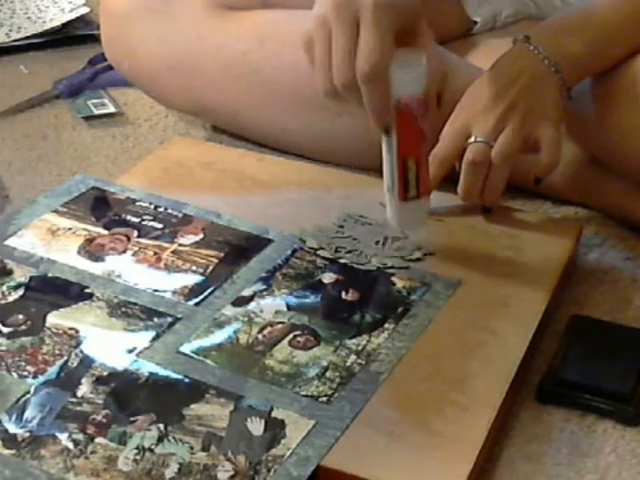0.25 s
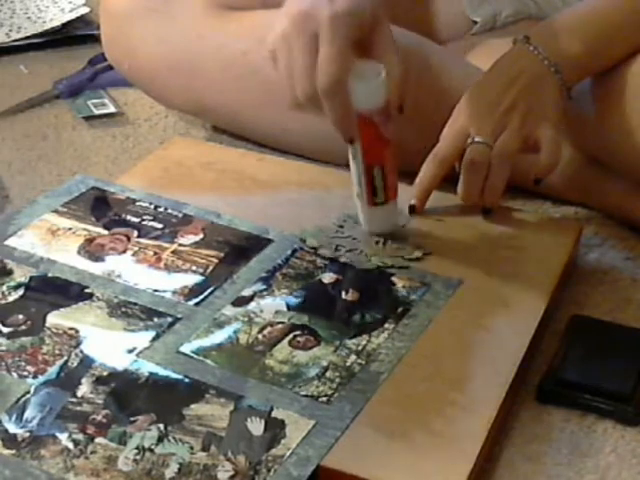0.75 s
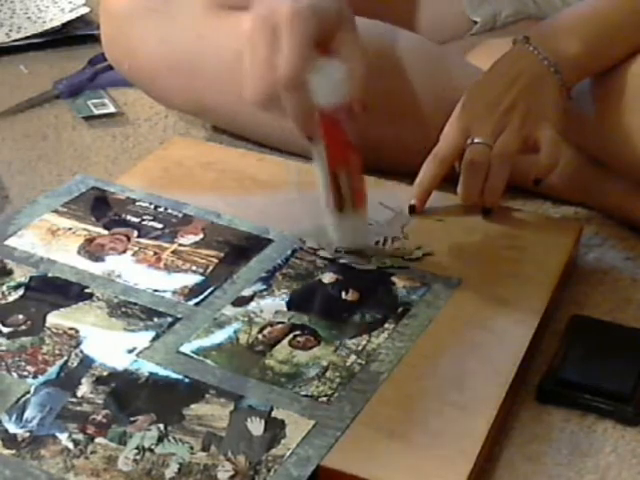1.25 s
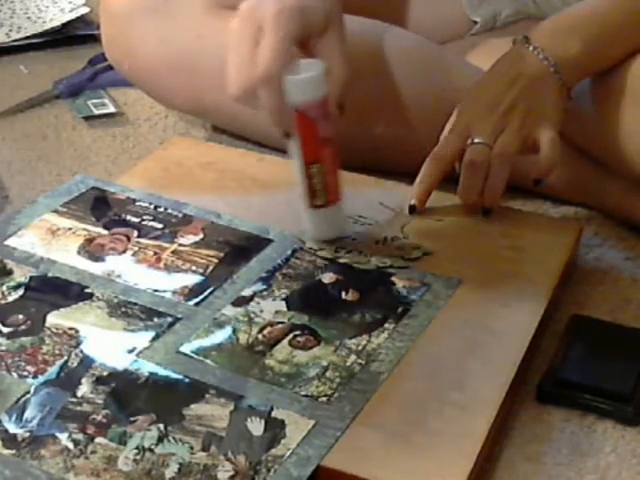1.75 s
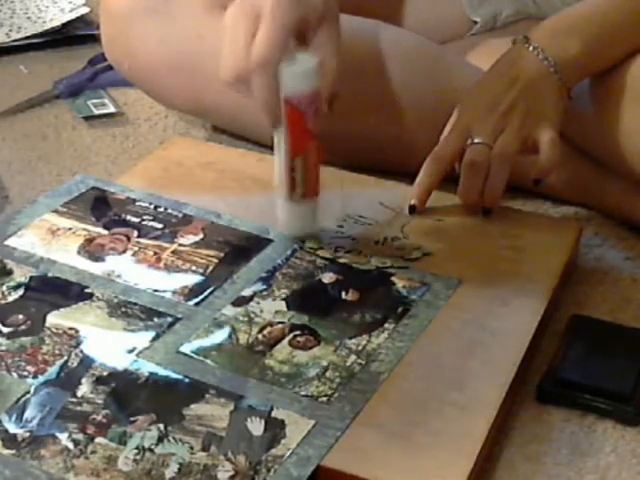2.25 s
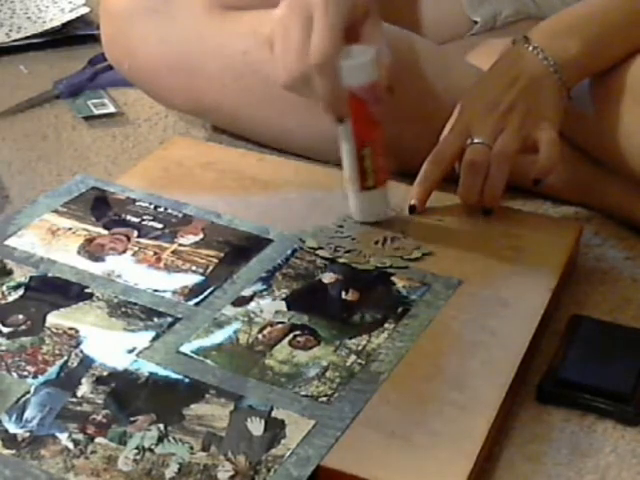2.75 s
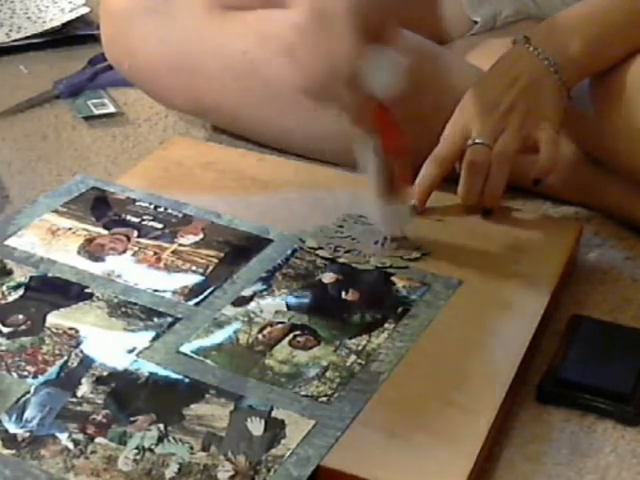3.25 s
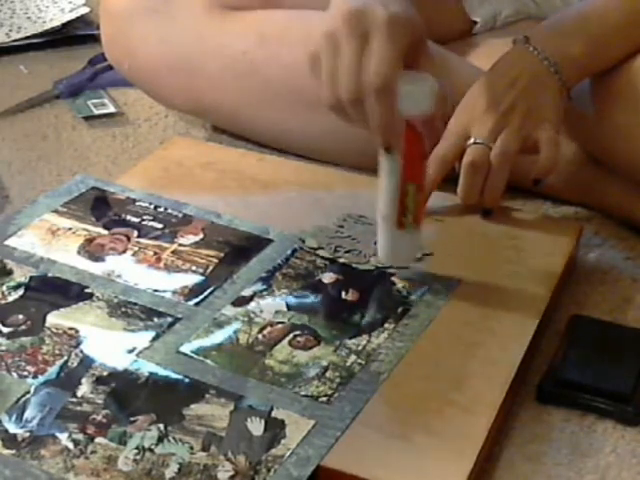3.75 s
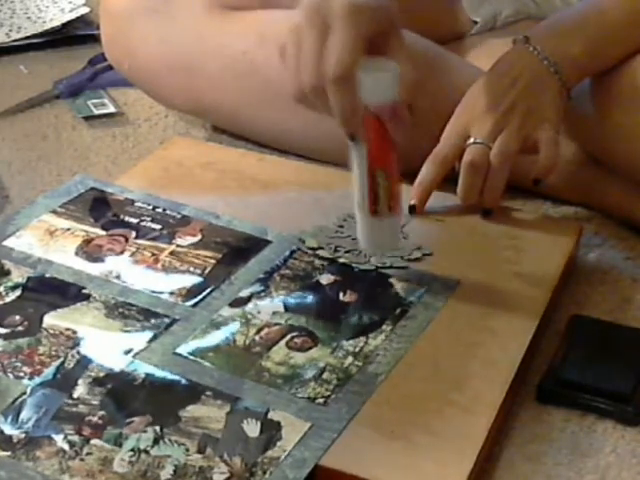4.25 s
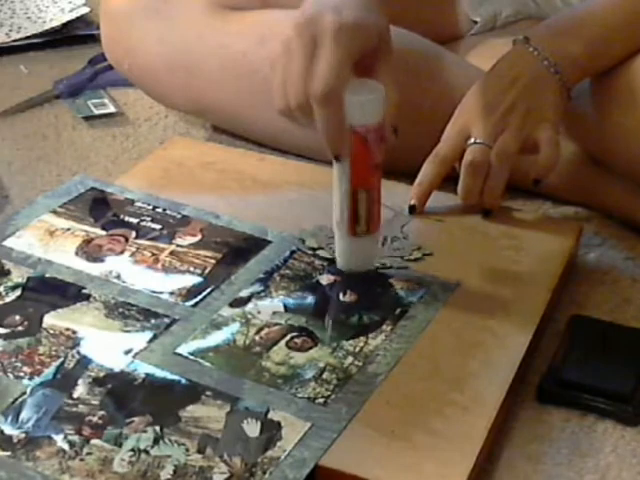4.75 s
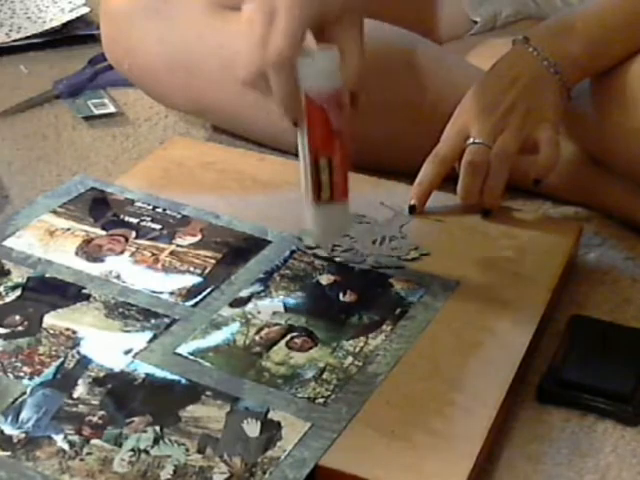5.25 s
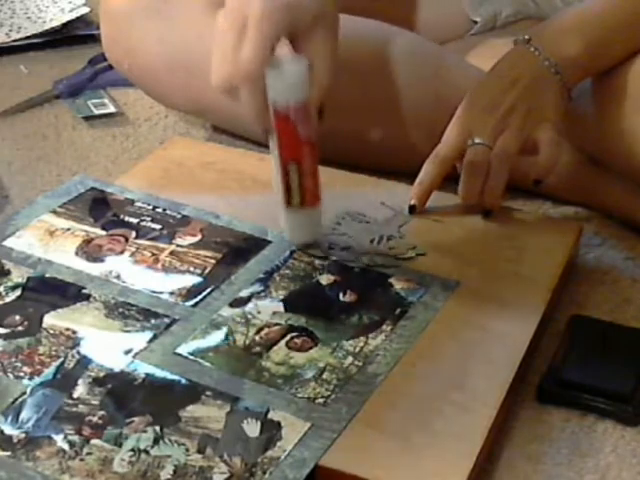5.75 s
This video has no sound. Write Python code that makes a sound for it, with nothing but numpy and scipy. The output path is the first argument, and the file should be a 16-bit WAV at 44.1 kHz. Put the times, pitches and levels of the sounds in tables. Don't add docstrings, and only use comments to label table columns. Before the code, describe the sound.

Close, dry indoor sound from a small camera microphone: steady low hum and hiss, with muffled low knocks of a glue stick on a board. Regular dabs come around two to three seconds, then lighter rubbing with papery rustles and stick-slip flutters, a bright snap, and three heavier thumps before six seconds.

```python
import sys
import numpy as np
from scipy import signal
from scipy.fft import rfft, irfft, next_fast_len
from scipy.io import wavfile
from scipy.ndimage import uniform_filter1d, map_coordinates

SR = 44100
rng = np.random.default_rng(int(sys.argv[2]) if len(sys.argv) > 2 else 0)


def materialize(psi):
    bounded = np.clip(np.atleast_2d(psi).T, -1, 1)
    quanta = np.round(bounded * 32767).astype(np.int16)
    wavfile.write(sys.argv[1], SR, quanta)


def gain_from_db(level_db):
    decades = np.asarray(level_db, float) / 20
    return 10 ** decades


N = 264582


def unit(x):
    return x / np.sqrt(np.mean(x ** 2) + 1e-20)


def along(points, hz):
    f, v = np.transpose(points)
    return np.interp(np.log(hz + 1), np.log(f + 1), v)


def wobble(rate):
    values = rng.standard_normal(int(N * rate / SR) + 4)
    return map_coordinates(values, [np.arange(N) * rate / SR])


def filtered(x, response):
    m = next_fast_len(len(x) + 8192)
    spectrum = rfft(x, m) * response(np.fft.rfftfreq(m, 1 / SR))
    return irfft(spectrum, m)[:len(x)]


def resonances(modes):
    def response(f):
        total = 0
        for k, (centre, width, db) in enumerate(modes):
            ringing = 1j * f * width / (centre * centre - f * f + 1j * f * width)
            total = total + (-1) ** k * gain_from_db(db) * ringing
        return total
    return response


def add(track, s, sound):
    part = track[max(round(s * SR), 0):][:len(sound)]
    part += sound[:len(part)]


def burst(t, rise, hold, t60):
    rise = max(rise, 1 / SR)
    onset = np.sin(np.pi / 2 * np.clip(t / rise, 0, 1)) ** 2
    fade = gain_from_db(-60 * np.clip(t - rise - hold, 0, None) / max(t60, .003))
    return onset * fade


def even(x):
    return unit(x / np.abs(signal.hilbert(x)) ** .5)


def hiss():
    # frequency in Hz, level in dB per Hz.
    hiss_colour = [(30, -33), (55, 4.5), (80, -2), (200, -1), (450, -5.5), (1100, -11), (1700, -15),
                   (2600, -17.5), (3400, -20.5), (5000, -22), (6500, -19), (7800, -30), (10000, -32),
                   (15700, -34.5)]
    z = signal.stft(rng.standard_normal(N), nperseg=512)[2]
    across_pitch = uniform_filter1d(rng.standard_normal(z.shape), size=6, axis=0)
    patches = uniform_filter1d(across_pitch, size=14, axis=1)
    patchy = signal.istft(z * gain_from_db(0.66 * unit(patches)), nperseg=512)[1][:N]
    return gain_from_db(-72.5 + 3.5) * unit(filtered(patchy, lambda f: gain_from_db(along(hiss_colour, f))))


def hum():
    # frequency in Hz, rms level in dB, speed of the wavering in Hz.
    hum_lines = [(92.5, -69.5, 4.5), (118, -79.5, 6.4), (166.6, -80, 6.2), (362.7, -76.5, 7.5),
                 (383.4, -65.5, 2), (855, -95, 11), (2630, -92.5, 12)]
    out, t = np.zeros(N), np.arange(N) / SR
    for hz, db, unsteady in hum_lines:
        drift = 0.14 * wobble(unsteady)
        out += gain_from_db(db + 2 + 1.7 * wobble(unsteady)) * np.sin(2 * np.pi * hz * t + drift)
    return out


def murmur():
    # time in seconds, level in dB.
    stir = [(0.0, -62), (0.13, -84), (0.72, -67), (0.92, -62), (1.19, -71.5), (1.47, -67.5), (2.09, -78),
            (2.55, -67), (3.93, -71), (4.4, -68), (4.66, -61), (5.08, -67.5), (5.41, -62.5), (5.78, -61.5),
            (6.0, -72)]
    pushes = rng.standard_normal(N) * gain_from_db(3.7 * wobble(25))
    board = resonances([(116, 69, 0.5), (156, 33, 0.95), (232, 41, -2.7)])
    s, stir_db = np.transpose(stir)
    level = np.interp(np.arange(N) / SR, s, stir_db)
    return gain_from_db(level - 8.0) * unit(filtered(pushes, board))


def scuffs():
    # start in seconds, peak in dB, upper tone in dB
    # against the peak, upper tone in Hz, length in seconds.
    stick_scuffs = [(0.752, -53, -9, 860, 0.01), (0.811, -58, -15, 850, 0.018),
                    (1.219, -68, 4.5, 840, 0.017), (2.1, -58.5, -20, 800, 0.014),
                    (2.37, -60, -19, 869, 0.021), (2.469, -41, -28, 850, 0.011),
                    (2.484, -44, -28, 840, 0.012), (2.821, -50.5, -15, 1077, 0.023),
                    (2.98, -51, -9.5, 814, 0.034), (3.396, -51.5, -11.5, 766, 0.013),
                    (3.598, -54.5, 0, 804, 0.017), (3.605, -43.5, -12.5, 786, 0.016),
                    (3.759, -54.5, -25, 991, 0.013), (3.951, -55.5, -17, 993, 0.013),
                    (4.135, -56.5, -7, 847, 0.026), (4.177, -53, -20, 824, 0.02),
                    (4.63, -50, -11, 900, 0.051), (4.643, -44.5, -8, 828, 0.028),
                    (5.214, -52, -30, 880, 0.009), (5.367, -51.5, -23, 825, 0.02),
                    (5.617, -49, -19, 880, 0.014), (5.8, -50, -24, 840, 0.029),
                    (0.208, -65, 2, 600, 0.013), (0.368, -57.5, -1.5, 700, 0.025),
                 (0.368, -61.5, 5, 1266, 0.014), (0.369, -60.5, 4.5, 1004, 0.014),
                 (0.385, -52.5, -7, 1030, 0.016), (3.012, -63.5, 2, 880, 0.013),
                 (4.656, -45, -7.5, 830, 0.017), (5.879, -51.5, -13, 1240, 0.017),
                 (5.941, -41.5, -15, 1315, 0.012), (5.935, -54, -5, 910, 0.019),
                 (5.94, -64, -4.5, 1676, 0.019)]
    # frequency in Hz, width in Hz, level in dB.
    board_tones = [(857, 14.6, -1.5), (1310, 57, -14.5), (2350, 190, -10)]
    out, t = np.zeros(N), np.arange(SR // 4) / SR
    lower = resonances([(489, 170, 0)])
    for s, db, upper_db, upper_hz, length in stick_scuffs:
        rub = rng.standard_normal((2, len(t)))
        upper = resonances([(upper_hz, 160, 0)] + board_tones)
        wood = even(filtered(rub[0], lambda f: lower(f) ** 2))
        wood = wood + gain_from_db(upper_db + 4.0) * even(filtered(rub[1], lambda f: upper(f) ** 2))
        shape = burst(t, 0.18 * length, 0.5 * length, 5 * length)
        add(out, s - .004, shape * gain_from_db(db - 9.5) * wood)
    return out


def nudges():
    # start in seconds, peak in dB, middle mode and low mode in dB against the peak.
    light_nudges = [(0.357, -60, -4, 14), (0.385, -59, -6, 0), (0.454, -60, -4, -5), (0.75, -59.5, 0, 10.5),
                    (0.772, -59, 4, 5), (0.788, -63, 5, 2), (0.906, -62, -8, -7), (1.478, -67, -10, 5),
                    (1.747, -50, -15, -10), (2.357, -66, 9, -15), (2.416, -65, -9, 10),
                    (2.507, -60, -13, 9), (2.581, -58, -2, -6), (2.607, -60, -5, -2),
                    (2.973, -52.5, -11, -1), (2.987, -52.5, -2, -1.5), (3.396, -58, -2, -20),
                    (3.529, -61, 1.5, -1), (3.672, -58, -10, -3), (3.963, -60.5, 3, 6), (2.883, -58, 3, -6),
                    (5.013, -52.5, 3.5, 1), (5.407, -52.5, -7, 1), (5.847, -55, -9, 8)]
    return [row + (264, 0.0096) for row in light_nudges]


def presses():
    # start in seconds, peak in dB, middle mode in dB against the peak,
    # upper mode in Hz, loss to the first rebound in dB.
    firm_dabs = [(0.362, -44, -19, 320, 9), (0.747, -42.5, -5.5, 268, 12), (1.733, -30, -10, 266, 23),
                 (2.13, -31.5, -9, 265, 20), (2.46, -29, -10, 263, 13.5), (2.811, -30.5, -5, 261.6, 15),
                 (3.383, -43.5, -20, 296, 20), (3.946, -41, -18, 294, 15), (5.023, -47.5, 1, 255, 25),
                 (5.361, -21, -15, 269.4, 15.5), (5.607, -22.5, -18, 275.3, 27.5),
                 (5.792, -15.5, -14, 270.7, 24.5)]
    contact_s, flight_s = 0.011, 0.023
    touches = []
    for s, db, middle_db, hz, loss_db in firm_dabs:
        low_db = -71 + 0.2 * (db + 30) - db
        press_s = contact_s + 0.00006 * (db + 32.5)
        touches.append((s, db, middle_db, low_db, hz, press_s))
        for k in range(3):
            rebound_db = db - loss_db - 12 * k
            touches.append((s + flight_s * (k + 1), rebound_db, middle_db + 3.5, -9, hz, contact_s))
    return touches


def drags():
    # start in seconds, peak in dB, time between slips in seconds, fade per slip in dB,
    # upper mode in Hz.
    sticky_drags = [(3.597, -45.5, 0.027, 0.5, 258), (4.113, -43.5, 0.027, 3, 261),
                    (4.514, -54.5, 0.035, 2.5, 258), (4.632, -44.5, 0.032, 5, 268),
                    (4.712, -50, 0.016, 3, 259), (5.822, -39, 0.022, 4, 256), (5.883, -44, 0.022, 10, 283)]
    return [(s + gap * k, db - fade_db * k, -23.5, -21, hz, 0.014)
            for s, db, gap, fade_db, hz in sticky_drags for k in range(3)]


def thumps():
    # frequency in Hz, level in dB, stretch of the contact time.
    low_modes = [
        (155.7, 6, 0.9),
        (90.2, 4.5, 1.5),
    ]
    out, t = np.zeros(N), np.arange(SR // 8) / SR

    def swell(life):
        choked = np.exp(-(t / life) ** 3.23)
        return np.tanh(t / 0.0028) ** 2 * (choked + 0.046 * np.exp(-t / 0.055))

    for s, db, middle_db, low_db, hz, contact in nudges() + presses() + drags():
        upper = np.sin(2 * np.pi * hz * t * (0.984 + 1.8 * t))
        thump = -gain_from_db(db - 4.5) * swell(1.38 * contact) * upper
        for rel_db, (mode_hz, mode_db, stretch) in zip((middle_db, low_db), low_modes):
            tone = np.sin(2 * np.pi * mode_hz * (t - .0038))
            thump -= gain_from_db(db + rel_db + mode_db) * swell(stretch * contact) * tone
        add(out, s + 0.00573, thump)
    return out


def rustles():
    # start in seconds, peak in dB, hold in seconds, boost at the centre in dB, centre in Hz.
    paper_ticks = [(0.363, -51, 0.014, 1, 5790), (0.368, -42, 0.0036, 15, 4000),
                   (0.75, -55.5, 0.007, 1, 2630), (0.89, -55, 0.01, -2, 6430),
                   (1.344, -60.5, 0.012, 9, 2650), (2.1241, -60, 0.011, 4, 2670),
                   (2.464, -52.5, 0.0059, 6, 3800), (2.813, -54.5, 0.012, 20, 2270),
                   (3.946, -58, 0.012, 5, 3690), (4.129, -46, 0.022, 15, 2450),
                   (4.121, -39, 0.02, -16, 6250), (4.626, -54, 0.0065, 12, 3700),
                   (4.634, -54.5, 0.014, 20, 2300), (5.006, -53, 0.02, -1, 5360),
                   (5.019, -37.5, 0.0052, 1, 5050), (5.069, -50.5, 0.015, 5, 6200),
                   (5.362, -41, 0.0081, 8, 6100), (5.605, -50, 0.011, 4, 6530),
                   (5.637, -57, 0.018, 6, 5900), (5.8, -50.5, 0.0082, -3, 4060),
                   (5.925, -58, 0.015, 4, 5070)]
    # frequency in Hz, level in dB per Hz.
    paper_colour = [(710, -35), (1200, -18), (1660, -11.5), (2620, -2.5), (3790, -1.5), (6370, 2.5),
                    (8170, -12.5), (14000, -24), (16000, -24)]
    out, t = np.zeros(N), np.arange(SR // 5) / SR
    for s, db, hold, boost_db, hz in paper_ticks:
        white, lumps = rng.standard_normal((2, len(t)))
        grain = gain_from_db(3.63 * unit(uniform_filter1d(lumps, size=40)))

        def colour(f):
            boost = 1 + gain_from_db(boost_db) / (1 + ((f - hz) / 450) ** 2)
            return gain_from_db(along(paper_colour, f)) * boost

        shape = burst(t, 0.53 * hold, hold, 0.053)
        add(out, s - .003, gain_from_db(db - 18.0) * grain * shape * unit(filtered(white, colour)))
    return out


def snaps():
    # start in seconds, peak in dB, ring in Hz.
    glue_snaps = [(0.8978, -50, 6530), (4.1984, -66, 5090), (5.0174, -29.5, 5170), (5.023, -43, 4470),
                  (5.0299, -48, 4630), (5.359, -37.5, 5800), (5.3643, -38.5, 6000), (5.3642, -37.5, 5050),
                  (5.6093, -52, 6540), (5.9254, -59, 5590), (5.9384, -57.5, 5170)]
    out, t = np.zeros(N), np.arange(SR // 5) / SR
    for s, db, hz in glue_snaps:
        ring = burst(t, 0.00015, 0, 0.0027) * np.sin(2 * np.pi * hz * t)
        noise = uniform_filter1d(rng.standard_normal(len(t)), size=2)
        crack = 0.16 * burst(t, .0001, 0, 0.0031) * noise
        thin = lambda f: (1j * f / (1800 + 1j * f)) ** 2
        add(out, s, gain_from_db(db - 0.5) * filtered(ring + crack, thin))
    return out


def scene():
    room = hiss() + hum() + murmur()
    return (room + scuffs() + thumps() + rustles() + snaps())[None]


def microphone(x):
    bass = resonances([(70, 85, 0)])
    return filtered(x, lambda f: bass(f) ** 2 * (1j * f / 85) ** 2 + gain_from_db(-27))


def converter(x):
    # multiple of the ripple frequency, level in dB.
    images = [(1, -30), (2, -38), (3, -41), (4, -44)]
    ripple_hz, t = 3898, np.arange(N) / SR
    ripple = sum(gain_from_db(db) * np.cos(2 * np.pi * k * ripple_hz * t) for k, db in images)
    ripple = ripple + gain_from_db(-37) * rng.standard_normal(N)
    low_tones = filtered(x, lambda f: f < 1500)
    return filtered(x + gain_from_db(-9.0) * ripple * low_tones, lambda f: f < 15780)


def band_limit(x):
    return signal.sosfilt(signal.butter(12, 16240, fs=SR, output="sos"), x)


def record(dry):
    mix = converter(microphone(dry[0]))
    return band_limit(mix[None])


dry = scene()
out = record(dry)
materialize(out)
```